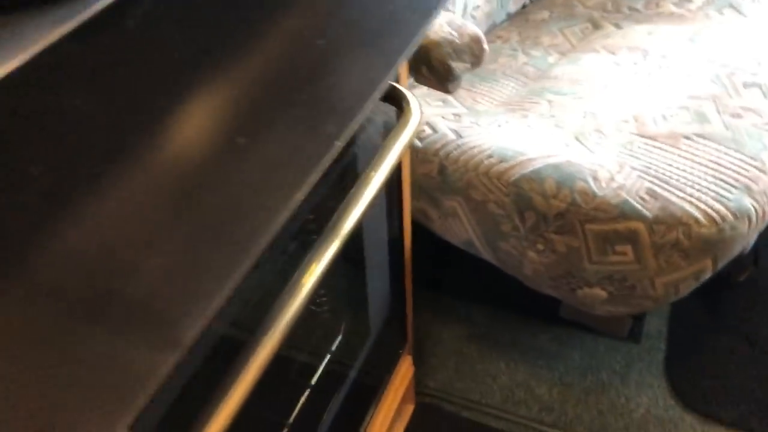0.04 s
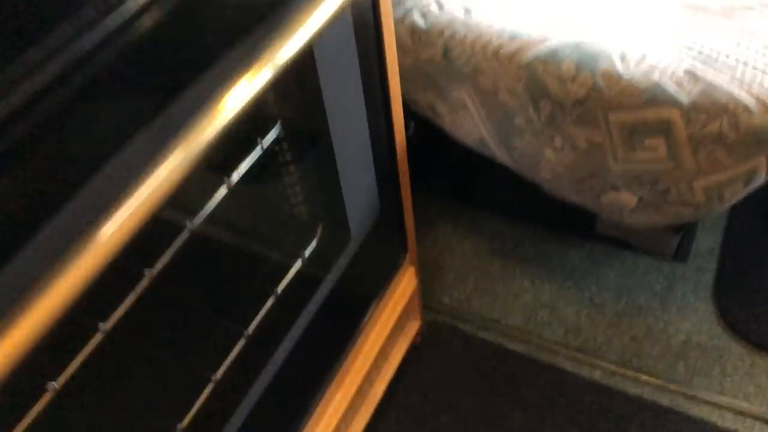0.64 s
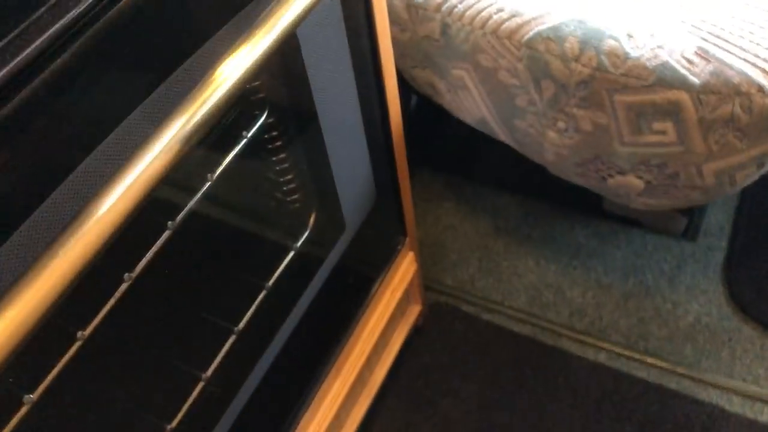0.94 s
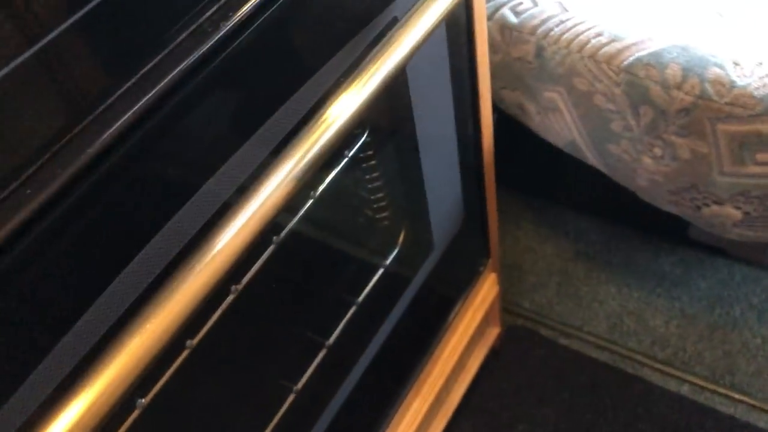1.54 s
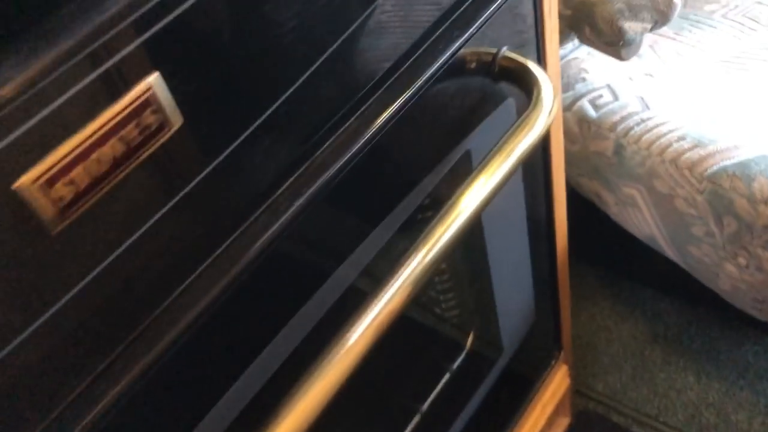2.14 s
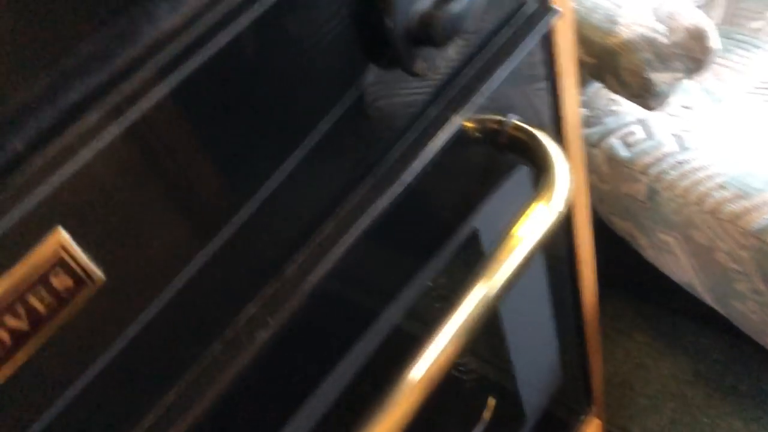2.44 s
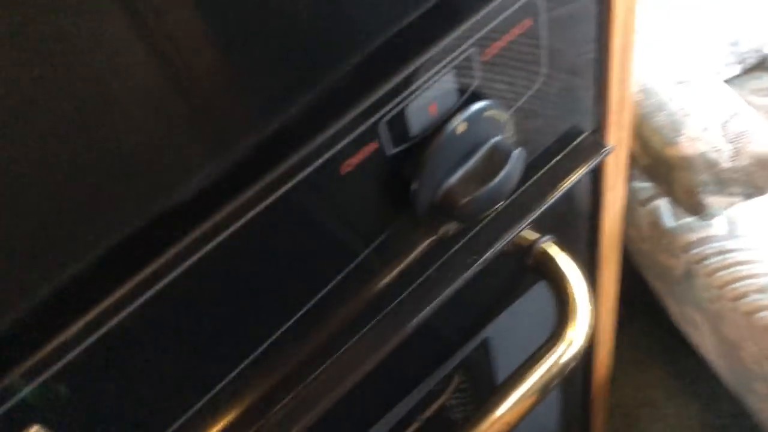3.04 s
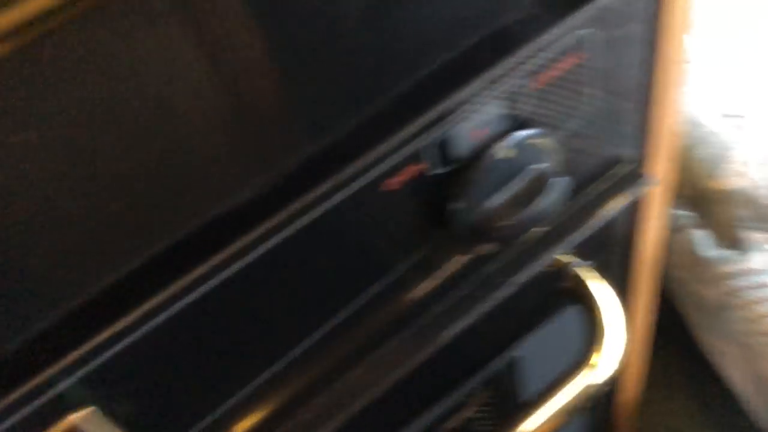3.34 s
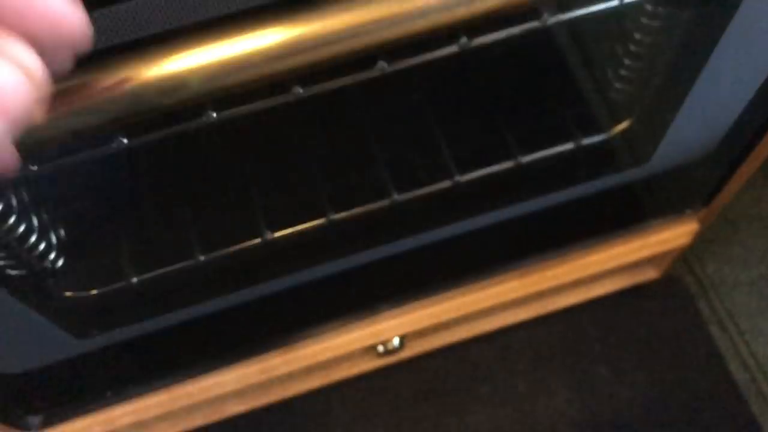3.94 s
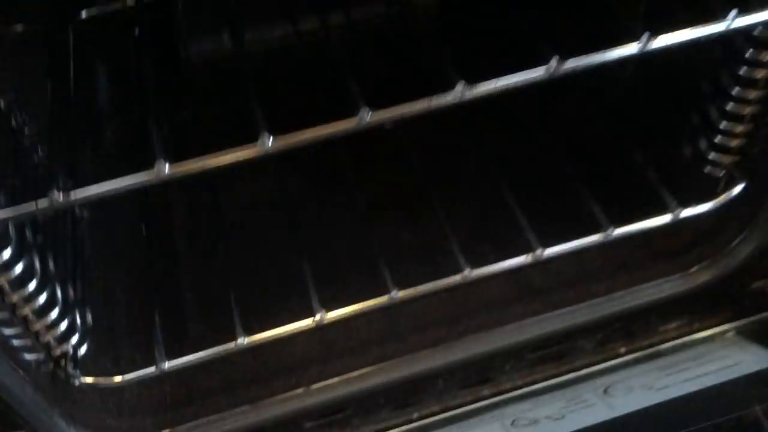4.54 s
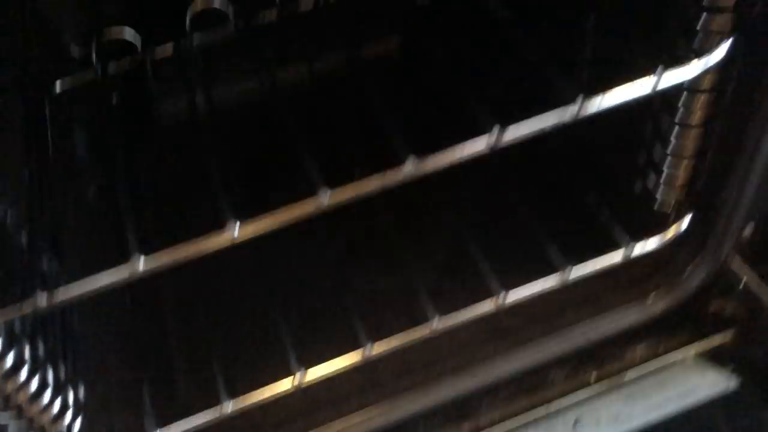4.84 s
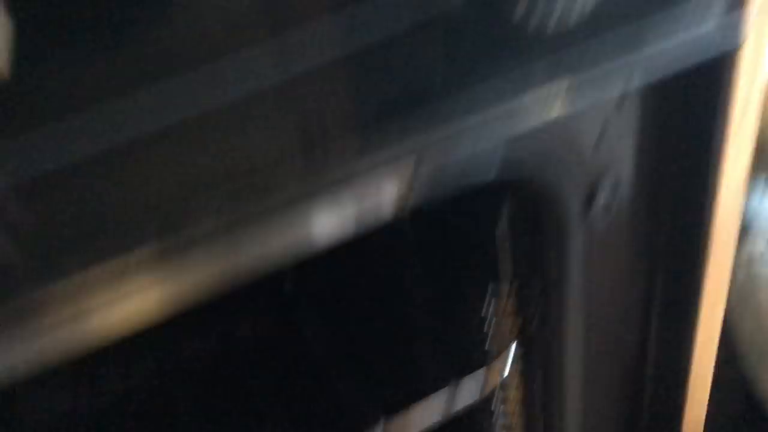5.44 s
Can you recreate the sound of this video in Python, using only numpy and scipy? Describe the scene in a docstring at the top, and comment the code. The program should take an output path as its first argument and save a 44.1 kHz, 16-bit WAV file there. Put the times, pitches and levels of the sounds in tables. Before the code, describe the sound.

An oven's metal parts are handled close to the microphone in a small, padded camper kitchen with a very short echo and faint room air. A brief wire rattle and light clicks open the sound. Four bursts of hard steel clanks follow, at about 0.4, 0.8, 1.3 to 1.7 and 2.2 seconds, the first the loudest. In each, a wire shelf chatters against briefly ringing sheet-steel panels, with dull knocks in the wooden cabinet underneath. Near 2.7 seconds a catch snaps sharply, and a few lighter clicks trail off by 3.2 seconds. A hand brushes by very faintly around 3.6 seconds, followed by a soft knock. From about 4.2 seconds the oven door swings open, much quieter than the clanks, with dull bumps, low thuds and a light scrape from the hinge. A last crisp tick comes near 5.3 seconds.

```python
"""Metal parts of a camper's oven are handled close by, in a small padded kitchen that answers only briefly.
First come light clicks, then four bursts of hard steel blows, with a wire shelf chattering against
ringing sheet-steel panels and dull knocks in the cabinet. Near 2.7 s a catch snaps. A hand brushes
softly by, and from about 4 s the door swings open with dull bumps, a light scrape and a last tick."""
import sys
import numpy as np
from scipy import signal
from scipy.fft import rfft, irfft, next_fast_len
from scipy.io import wavfile
from scipy.ndimage import map_coordinates

SR = 44100
rng = np.random.default_rng(int(sys.argv[2]) if len(sys.argv) > 2 else 0)


def unload_audio(sound):
    """Save the sound as a 16-bit wav file, at the path given as the first command line argument."""
    columns = np.transpose(np.atleast_2d(sound))
    # keep every value between -1 and 1, then stretch to whole-number steps
    steps = np.round(np.clip(columns, -1, 1) * 32767)
    wavfile.write(sys.argv[1], SR, steps.astype(np.int16))


N = 250488
TIME = np.arange(N) / SR
AGE = TIME[:SR]  # seconds since a blow


def amp(db):
    """Turn decibels into a gain."""
    return np.exp(np.asarray(db) * np.log(10) / 20)


def unit(x):
    """Scale a sound to an average (rms) strength of 1."""
    return x / np.sqrt(np.mean(x ** 2) + 1e-20)


def along(points, hz):
    """Read between (frequency, value) points, with octaves evenly spaced."""
    freqs, values = np.transpose(points)
    return np.interp(np.log(hz + 1), np.log(freqs), values)


def filtered(x, gain):
    """Turn each frequency up or down by gain(hz)."""
    padded = next_fast_len(len(x) + SR // 2)
    hz = np.fft.rfftfreq(padded, 1 / SR)
    return irfft(rfft(x, padded) * gain(hz), padded)[:len(x)]


def noise(spectrum, size=SR):
    """Noise of strength 1, coloured by (frequency, level) points."""
    padded = next_fast_len(size)
    gain = amp(along(spectrum, np.fft.rfftfreq(padded, 1 / SR)))
    return unit(irfft(rfft(rng.standard_normal(padded)) * gain, padded)[:size])


def resonance(hz, width_hz, size=SR):
    """Noise of strength 1, gathered around one pitch."""
    return unit(filtered(rng.standard_normal(size), lambda f: 1 / (1 + ((f - hz) / width_hz) ** 2)))


def fade(t60):
    """Die away after a blow; t60 is the seconds it takes to fall by 60 dB."""
    return np.exp(-np.log(1000) * AGE / max(t60, 1e-3))


def tone(hz, width_hz, size=SR):
    """A note that wavers as loose parts shift; more width makes it rougher."""
    knots = np.linspace(0, 1, 256)
    drift = np.cumsum(rng.standard_normal(len(knots))) * np.sqrt(2 * np.pi * width_hz * knots[1])
    phase = np.interp(AGE[:size], knots, 2 * np.pi * (hz * knots + rng.random()) + drift)
    return np.sqrt(2) * np.sin(phase.astype(np.float32))


def ring(notes, scatter_db, width_hz):
    """Steel rings at its own notes; each contact changes their pitch a little, their level by scatter_db."""
    out = np.zeros(SR)
    for hz, db, t60 in notes:
        size = int(np.clip(t60, 0.01, 1) * SR)
        pitch = hz + 0.008 * min(hz, 1000) * rng.normal()
        strength = amp(db + scatter_db * rng.normal())
        out[:size] += strength * fade(t60)[:size] * tone(pitch, width_hz, size)
    return out


def wobble(rate):
    """A smooth random curve through `rate` new values a second."""
    return map_coordinates(rng.standard_normal(int(TIME[-1] * rate) + 4), [TIME * rate])


def add(track, t, sound):
    """Mix a sound into a track at t seconds."""
    start = round(t * SR)
    part = sound[max(-start, 0):N - start]
    track[max(start, 0):][:len(part)] += part


# Tone colour of the room's air: f/Hz, level/dB
AIR_COLOUR = [(20, -18.5), (40, 2.5), (62, 3), (120, -13.5), (250, -17.5), (550, -9.5), (1100, -11),
              (2100, -16.5), (5000, -20.5), (11800, -27), (17000, -38)]
# Tone colour of the handling rumble: f/Hz, level/dB
RUMBLE_COLOUR = [(22, -33), (40, -20.5), (65, 2.5), (110, 0.5), (220, -4), (330, -3), (500, -10.5),
                 (1200, -40.5), (5000, -78)]
def background():
    """Quiet room air and a faint, uneven rumble of handling."""
    sway_db = 2.8 * wobble(3.2)
    return amp(-69) * noise(AIR_COLOUR, N) + amp(-70 + sway_db) * noise(RUMBLE_COLOUR, N)


# How long the kitchen's echo lasts: f/Hz, t60/s
ECHO_TIMES = [(80, 0.63), (300, 0.16), (1500, 0.16), (5000, 0.021), (14000, 0.15)]
def kitchen_echo(sound):
    """Near walls and cushions give a short, dense answer."""
    hz, t, hiss = signal.stft(rng.standard_normal(SR // 2), SR, nperseg=256)
    decay = np.exp(-np.log(1000) * t / along(ECHO_TIMES, hz)[:, None])
    tail = signal.istft(hiss * decay, SR, nperseg=256)[1]
    tail *= 1 - fade(0.033)[:len(tail)]
    return signal.fftconvolve(sound, tail / np.linalg.norm(tail))[:N]


# Tone colour of the brushing hand: f/Hz, level/dB
BRUSH_COLOUR = [(200, -1), (1000, 4), (4000, 3.5), (9000, -2), (13000, -8), (17000, -14)]
def hand_brush():
    """A soft brush swells and fades as the hand reaches for the handle."""
    return amp(-65.5) * noise(BRUSH_COLOUR, N) * np.exp(-((TIME - 3.58) / 0.075) ** 2)


# How strongly the door rubs as it swings: t/s, level/dB
SWING = [(4.1, -75), (4.28, -64.5), (4.335, -58), (4.422, -58), (4.504, -59.5), (4.644, -60), (4.73, -71),
         (4.914, -77), (5.066, -58), (5.156, -60), (5.288, -58.5), (5.366, -84.5), (5.5, -89)]
# Pitches at which the door's panel and hinge ring: f/Hz, width/Hz, level/dB
HINGE_NOTES = [(1020, 190, 0), (1420, 130, -2), (2240, 460, -1), (3200, 330, -3)]
# Tone colour of the rubbing: f/Hz, level/dB
SCRAPE_COLOUR = [(40, -27), (150, 0), (330, 4), (480, -1.5), (620, 1), (760, -9.5), (1040, 1), (1400, -11),
                 (2000, -4.5), (3200, -13.5), (6400, -18.5), (11000, -28.5), (16000, -38)]
def door_scrape():
    """The swinging door rubs in tiny, clumped slips that make its panel and hinge ring."""
    rub_db = np.interp(TIME, *np.transpose(SWING), left=-120, right=-120)
    grit = amp(2.5 * wobble(350) + 1.1 * wobble(30))
    hinge = sum(amp(db + 1.5 * wobble(42)) * resonance(hz, width, N) for hz, width, db in HINGE_NOTES)
    hinge_db = rub_db.max() - 8.5 + 2.2 * (rub_db - rub_db.max())  # swells faster than the rubbing
    rubbing = amp(rub_db - 3.5) * unit(noise(SCRAPE_COLOUR, N) * grit)
    return rubbing + amp(hinge_db) * unit(grit * hinge)


# Bumps of the swinging door: t/s, level/dB, rise/s, treble edge/Hz, thud/dB
BUMPS = [(4.209, -45, 0.0046, 3240, -3), (4.563, -41.5, 0.008, 2650, -5), (4.646, -54, .003, 3000, -8),
         (4.797, -52, 0.0055, 2170, -16), (4.9, -43.5, 0.011, 1500, 0), (4.916, -41, 0.0031, 2620, 1.5),
         (4.982, -45.5, 0.0045, 1870, 0.5), (5.014, -46, 0.0047, 1500, -1), (5.073, -41, 0.0037, 1280, 3.5)]
# Tone colour of the door's clack: f/Hz, level/dB
DOOR_COLOUR = [(150, -12), (400, -14), (700, -2.5), (1080, 0.5), (1500, -5), (2100, -8), (3500, -9.5),
               (9000, -15)]
# Tone colour of the thud under it: f/Hz, level/dB
THUD_COLOUR = [(40, -10), (130, 6), (240, -1.5), (410, 2), (600, -10.5), (1500, -52)]
def door_bumps():
    """The door bumps softly on its hinges and stays: a dull clack over a short, low thud."""
    out = np.zeros(N)
    for t, db, rise, edge_hz, thud_db in BUMPS:
        muffled = filtered(noise(DOOR_COLOUR), lambda hz: 1 / np.sqrt(1 + (hz / edge_hz) ** 4))
        clack = unit(muffled) * fade(0.13)
        thud = amp(thud_db) * noise(THUD_COLOUR) * fade(0.25)
        add(out, t, amp(db - 7.5) * (clack + thud) * np.clip(AGE / rise, 0, 1))
    return out


def boom(db, hz):
    """A soft, heavy contact booms in the wooden cabinet: a low note with noise around it."""
    colour = [(hz / 6, -30), (hz / 2, -8), (hz, 0), (hz, -5), (hz * 2.16, -21), (hz * 15, -70)]
    wood = amp(-5) * tone(hz, width_hz=8.4) + amp(-7) * noise(colour)
    return amp(db) * wood * fade(0.15) * (1 - fade(0.018))


# Dull knocks on the cabinet: t/s, level/dB, f/Hz
KNOCKS = [(0.33, -43.5, 155), (0.421, -33, 307), (0.537, -35, 217), (0.609, -44, 92), (0.736, -43.5, 98),
          (0.896, -40.5, 204), (1.457, -33, 319), (1.574, -48.5, 105), (1.643, -41.5, 353),
          (2.121, -33.5, 218), (2.162, -46, 310), (2.87, -46, 97.5), (3.297, -55.5, 124), (3.838, -42, 272),
          (3.867, -45.5, 127), (3.951, -51, 107), (4.16, -54, 254), (4.251, -53, 263), (4.588, -48, 350),
          (4.625, -48.5, 58.7), (4.725, -49.5, 80), (4.92, -56, 284), (5.079, -48, 237), (5.085, -41.5, 88),
          (5.34, -44.5, 110.5), (5.411, -50, 104)]
def cabinet_knocks():
    """The door and the hand bump the cabinet."""
    out = np.zeros(N)
    for t, db, hz in KNOCKS:
        add(out, t, boom(db, hz))
    return out


# Tone colour of a small clicking part: f/Hz, level/dB
CLICK_COLOUR = [(200, -29), (700, -4.5), (1200, -2), (2200, -4.5), (3500, -4), (5000, -6), (8000, -22.5),
                (16000, -59.5)]
# Tone colour of the low knock in a click or blow: f/Hz, level/dB
KNOCK_COLOUR = [(30, -43), (100, 2), (290, 8.5), (600, 0.5), (900, 1), (1500, -7), (4000, -78)]
# Tone colour of the bright snap in a click or blow: f/Hz, level/dB
SNAP_COLOUR = [(1000, -60.5), (3500, -2), (5500, 0.5), (6800, 1), (8000, 0.5), (12000, -7.5), (17000, -31)]
def click(db, knock_db, snap_db):
    """A small part snaps home: a bright crack and a brief ring, with the door's knock just behind."""
    t60 = 0.097 * 2 ** (-snap_db / 27)  # a softer contact lasts longer
    rise = 0.00065 * 2 ** (-db / 10.5)  # a weaker click builds more slowly
    pitch_ratio = 2 ** ((db + 42) / 34)  # a louder click is higher
    hz = 1339 * pitch_ratio
    tilt = 0.28 * min(snap_db + 20.5, 0)  # dB an octave: very little snap sounds dull
    colour = [(f * pitch_ratio ** 0.053, level + tilt * np.log2(f / hz)) for f, level in CLICK_COLOUR]
    note = tone(hz * np.exp(0.2 * rng.normal()), width_hz=590)
    body = (amp(-13) * noise(colour) + amp(-16) * note) * fade(t60)
    knock = amp(knock_db - 6.5) * noise(KNOCK_COLOUR) * fade(0.24) * (1 - fade(0.015))
    snap = amp(snap_db - 11) * noise(SNAP_COLOUR) * (fade(0.38 * t60) + 0.64 * fade(0.017))
    return amp(db) * (body + knock + snap) * (1 - fade(rise))


# Light, dry clicks: t/s, level/dB, knock/dB, snap/dB
CLICKS = [(0.13, -47, 4.5, -10), (0.209, -38, -6.5, -10), (0.223, -37, -14, -6.5), (0.273, -40.5, -7, -19),
          (0.36, -25, -6, -0.5), (0.5874, -32, -28, 4), (0.712, -35.5, -16, -12), (0.7284, -38, -4, -17),
          (0.882, -26, -26, 0), (1.284, -41, -1.5, -38), (1.562, -38, -7, -29), (1.6861, -38, -23, 1),
          (1.7227, -37.5, -5.5, -33), (2.062, -45, -4.5, -14), (2.099, -35.5, -23, -8),
          (2.334, -33, -9.5, -12.5), (2.342, -42, -20.5, 0), (2.3826, -36, -9.5, -9),
          (2.6405, -40.5, -10.5, -6.5), (2.6789, -20.5, -31, -1.5), (2.6853, -22, -8.5, -3),
          (2.7306, -27.5, -10, -33), (2.7396, -28, -15, 0), (2.765, -39.5, -7, -39),
          (2.82, -42.5, -16, -21), (2.8971, -45.5, -26, -26), (3.007, -43, -15, -25),
          (3.0873, -35.5, -6, -4.5), (3.1524, -47, -10, -29), (4.915, -67, -14, 0), (5.207, -47, -8, -8),
          (5.2803, -33, -19, -4)]
def clicks(boom_lag_s=0.018, boom_hz=104.4):
    """Catch, knob and hinge click, and the cabinet answers each with a low boom."""
    out = np.zeros(N)
    for t, db, knock_db, snap_db in CLICKS:
        boom_db = db + knock_db - 15.5 - 0.37 * snap_db  # a brief, hard contact hardly moves the cabinet
        add(out, t, click(db, knock_db, snap_db))
        add(out, t + boom_lag_s, boom(boom_db, boom_hz * np.exp(0.2 * rng.normal())))
    return out


# Tone colour of the shelf's wires: f/Hz, level/dB
WIRE_COLOUR = [(1500, -14.5), (3600, 0.5), (4900, 0), (6200, -8), (7000, -20), (8300, -9.5), (11000, -21)]
def wire_notes(count=110):
    """The bending wires ring at many close notes, one a row; the higher ones die sooner."""
    hz = np.linspace(1500, 11000, count)[:, None] + rng.normal(0, 40.3, (count, 1))
    t60 = 0.32 * (hz / 3500) ** -0.35
    ringing = np.exp((2j * np.pi * hz - np.log(1000) / t60) * AGE[:SR // 2])
    return (amp(along(WIRE_COLOUR, hz)) * ringing).astype(np.complex64)


def twang(wires):
    """Every contact shares its energy among the wires' notes differently."""
    share = rng.standard_normal(len(wires)) + 1j * rng.standard_normal(len(wires))
    mix = (share.astype(np.complex64) @ wires).real / np.sqrt(len(wires))
    return np.pad(mix, (0, SR - len(mix)))


# Rattles of the shelf: t/s, level/dB, rise/s, settling/s, brightness/dB, note/Hz, note/dB
RATTLES = [(-.03, -32.5, 0.0017, 0.12, 13.5, 4780, -9), (.428, -32, 0.0078, 0.31, 6, 1350, -4),
           (.455, -38.5, 0.084, 0.22, 18, 1324, -2.5), (0.826, -39.5, 0.0056, 0.23, 12.5, 1320, -7),
           (.88, -30.5, 0.0056, 0.1, 8.5, 1340, -21), (.9, -34.5, 0.0027, 0.16, 16, 1318, -4.5),
           (.935, -36, 0.026, 0.2, 14.5, 2330, -5), (1.1, -57.5, 0.077, 0.13, 5, 1313, -17),
           (1.308, -33, 0.019, .05, -3, 1300, -5), (1.33, -33, 0.0065, .26, 8, 1670, -6),
           (1.369, -46, 0.066, 0.15, -8, 1336, 19), (1.47, -44.5, 0.028, 0.21, 3, 3500, -6),
           (1.733, -48, 0.008, 0.1, -19, 1660, -13.5), (2.095, -46.5, 0.011, 0.39, 1, 1280, -13),
           (2.165, -39, 0.007, 0.21, 10.5, 3800, -6), (2.335, -46.5, 0.02, 0.23, -13, 1616, -5)]
# Notes of the sheet-steel panels and shelf frame: f/Hz, level/dB, t60/s
PANEL_NOTES = [(210.8, -4.5, 0.27), (329.8, -6, .36), (580.7, -1.5, 0.22), (830, -5, 0.3), (894.6, 0, .2),
               (1022, -2.5, 0.15), (1300, -7.5, 0.31), (1312, -25.5, 2.7), (1306, 4.5, 0.12),
               (1444, -9.5, .25), (1590, -10.5, .5), (1652, -1, 0.152), (2004, -8, 0.33),
               (2304, -3.5, 0.32), (2470, -11.5, 0.25), (2780, -16, 0.27), (3203, -9.5, 0.47),
               (3421, -15.5, 0.8), (3670, -15.5, 0.58), (4010, -16, 0.53), (4330, -12, 0.26),
               (4760, -16.5, 0.48), (5170, -22, .38), (6250, -22, 0.34)]
# Tone colour of one tap of the shelf: f/Hz, level/dB
CHATTER_COLOUR = [(60, -43), (200, -23), (450, 2), (800, -2.5), (1350, 4), (1900, -1.5), (3200, 0),
                  (4500, -11), (7000, -23), (16000, -45)]
# Tone colour of the tap's bright jingle: f/Hz, level/dB
JINGLE_COLOUR = [(1500, -4), (3500, 5), (5500, 2), (7000, -3), (8300, -3), (12000, -16), (17000, -38.5)]
# Tone colour of the cabinet's boom under the shelf: f/Hz, level/dB
CABINET_COLOUR = [(30, -43), (60, -6), (92, 6.5), (150, -16), (210, 10.5), (275, -25.5), (335, -7),
                  (600, -30), (3000, -60.5)]
def shelf_rattles(wires, taps_per_s=900, points=4):
    """The shelf buzzes on several points, ever more weakly until still; one wire or panel sings out."""
    out = np.zeros(N)
    for t, db, rise, settling, bright_db, note_hz, note_db in RATTLES:
        bounce = np.clip(AGE / rise, 0, 1) * np.clip(1 - (AGE - rise) / settling, 0, 1) ** 2.55
        # a fine, bright buzz stays in the wires, so panels and cabinet get less of it
        panels = amp(-8.5 - 0.15 * bright_db) * ring(PANEL_NOTES, scatter_db=3.5, width_hz=32.6)
        cabinet_db = -11 - 0.13 * bright_db
        for _ in range(points):
            touches = rng.random(SR) < taps_per_s / points / SR
            taps = touches * np.exp(0.51 * rng.standard_normal(SR))  # uneven in strength
            contact = (noise(CHATTER_COLOUR) + amp(bright_db - 9.5) * noise(JINGLE_COLOUR)) * fade(0.12)
            cabinet = amp(cabinet_db) * noise(CABINET_COLOUR) * fade(0.45)
            note = amp(note_db - 2.5) * tone(note_hz, width_hz=36) * fade(0.37)
            one_tap = contact + panels + note + amp(-2) * twang(wires) + cabinet
            buzz = signal.fftconvolve(unit(taps) * bounce, one_tap / np.linalg.norm(one_tap))
            add(out, t, amp(db) * buzz / np.sqrt(points))
    return out


# Tone colour of steel hitting steel: f/Hz, level/dB
CLACK_COLOUR = [(200, -32), (700, 0), (1500, -2.5), (2200, 0), (3300, -6), (4200, -2), (4800, -12.5),
                (8000, -21.5), (16000, -67.5)]
# Notes in the short clang of the struck steel: f/Hz, level/dB, t60/s
CLANG_NOTES = [(575, -4, 0.03), (798, -6.5, 0.032), (1400, -9.5, 0.09), (1680, -1, 0.054),
               (2284, -6, 0.048), (2977, 0, 0.015), (2960, -16, 0.033), (3975, -21.5, 0.16),
               (6300, -15, 0.078), (7710, -18.5, 0.1265)]
def steel_blow(wires, db, knock_db, snap_db, ping_hz, ping_db, ring_db, edge_hz, edge_db):
    """A bare edge hits sheet steel: a crack, ping, clang and low knock, then panels and wires ring on."""
    clack = amp(-15.5) * noise(CLACK_COLOUR) * (0.95 * fade(0.12) + 0.99 * fade(0.015))
    edge = amp(edge_db) * resonance(edge_hz, width_hz=400) * fade(0.029)
    ping = amp(ping_db) * tone(ping_hz, width_hz=12) * fade(0.041)
    clang = amp(-17) * ring(CLANG_NOTES, scatter_db=-3.5, width_hz=20)
    knock = amp(knock_db - 9) * noise(KNOCK_COLOUR) * fade(0.11) * (1 - fade(0.0098))
    snap = amp(snap_db - 4.5) * noise(SNAP_COLOUR) * (fade(0.064) + 0.44 * fade(0.0097))
    tail = amp(-24) * ring(PANEL_NOTES, scatter_db=0, width_hz=22) + amp(-48.5) * twang(wires)
    attack = 1 - fade(0.0015)
    return amp(db) * (clack + edge + ping + clang + knock + snap + amp(ring_db) * tail) * attack


# Hard blows: t/s, level/dB, knock/dB, snap/dB, ping/Hz, ping/dB, ring/dB, edge/Hz, edge/dB
BLOWS = [(0.397, -16.5, -23, -21, 1624, -8.5, -8.5, 3250, -3),
         (0.4193, -12.5, -11.5, -18, 1507, -11.5, -7.5, 4080, -13.5),
         (0.4699, -24.5, -4, -22, 920, -4.5, -16, 2270, -8),
         (0.8166, -17.5, -31, -23, 1697, -7.5, -6.5, 3030, -6),
         (0.8392, -21, -3, -13.5, 1490, -4.5, 4, 3300, -17),
         (0.8867, -25.5, 3, 2, 1390, -15, 9.5, 2890, -9), (0.9118, -27, -1, -10, 1306, -3, 1.5, 2000, -5),
         (1.336, -22.5, -18, -22, 1615, -7, 6, 2700, -10),
         (1.455, -22, -16, -18, 1570, -11.5, -0.5, 3300, -26),
         (1.6346, -42.5, 9.5, -30, 1210, -17, 7, 2750, -3.5),
         (1.701, -25, -15, -15, 1623, -5.5, -2, 2160, -9), (2.153, -31.5, -6, -13, 1180, -8, 5, 3360, -24),
         (2.162, -16, -12, -22, 1490, -9, -2.5, 3530, -13.5),
         (2.1761, -26, -11, -19, 1320, 2.5, -4, 1900, -6),
         (2.2616, -23.5, -3, -16.5, 1580, -4.5, -1, 3750, -10.5)]
def steel_blows(wires, rebound_s=0.016):
    """Steel meets steel, bounces and lands once more, weaker and with less snap."""
    out = np.zeros(N)
    for t, db, knock_db, snap_db, *ringing in BLOWS:
        add(out, t, steel_blow(wires, db, knock_db, snap_db, *ringing))
        add(out, t + rebound_s, steel_blow(wires, db - 12, knock_db, snap_db - 15, *ringing))
    return out


def scene():
    """The oven's sounds and their echo in the quiet little kitchen."""
    wires = wire_notes()
    metal = steel_blows(wires) + clicks() + shelf_rattles(wires)
    oven = metal + cabinet_knocks() + door_bumps() + hand_brush() + door_scrape()
    return (oven + amp(-10) * kitchen_echo(oven) + background())[None]


def record(dry, low_cut_hz=50, top_hz=17000):
    """The small microphone loses the deepest bass, and the very highest treble is cut off."""
    bass = lambda hz: hz ** 3 / np.sqrt(hz ** 6 + low_cut_hz ** 6)
    return filtered(dry[0], lambda hz: bass(hz) * (hz < top_hz))[None]


dry = scene()
out = record(dry)
unload_audio(out)
```